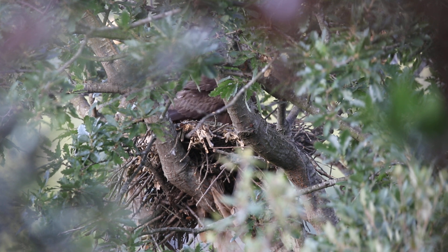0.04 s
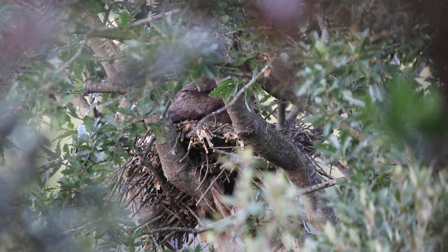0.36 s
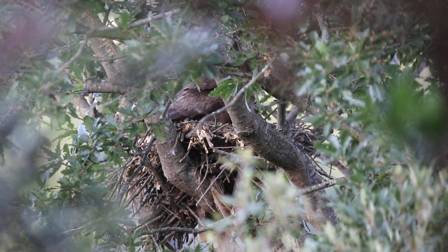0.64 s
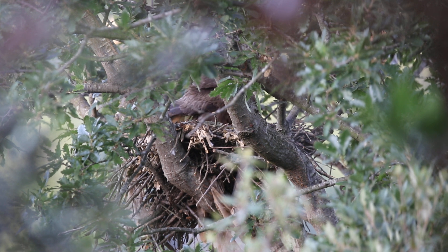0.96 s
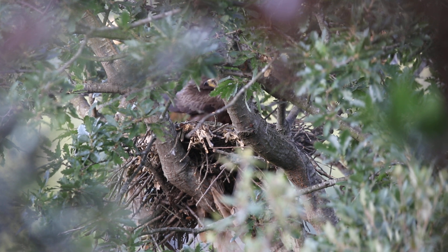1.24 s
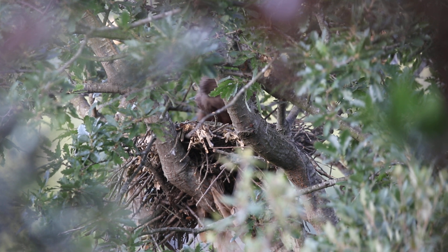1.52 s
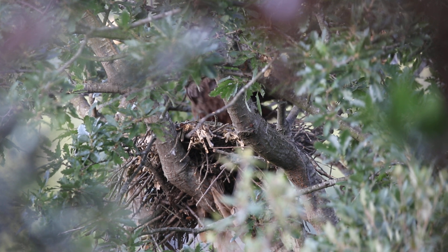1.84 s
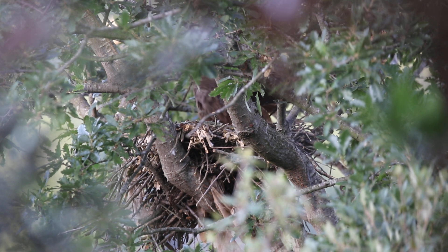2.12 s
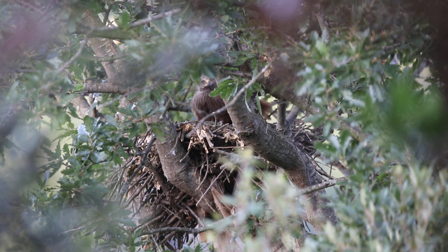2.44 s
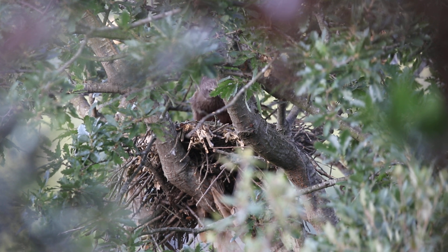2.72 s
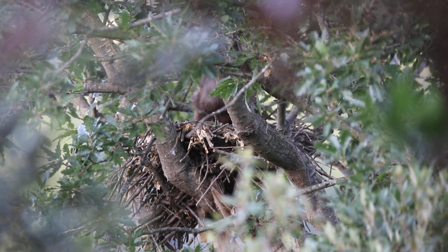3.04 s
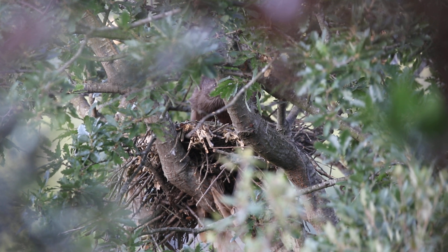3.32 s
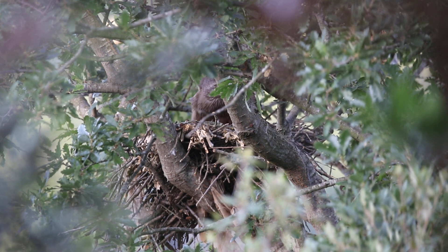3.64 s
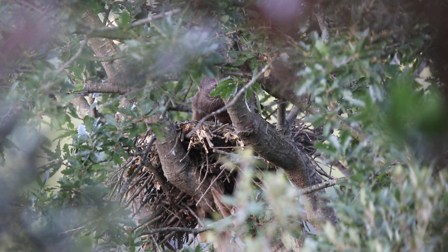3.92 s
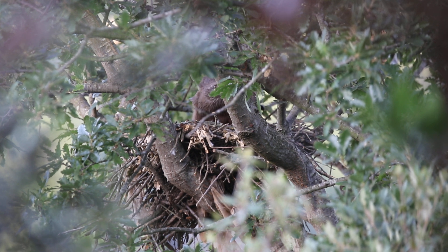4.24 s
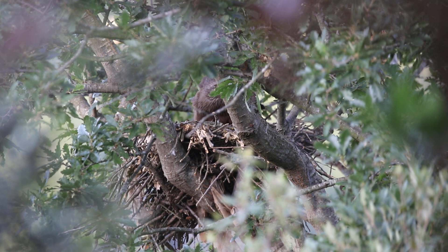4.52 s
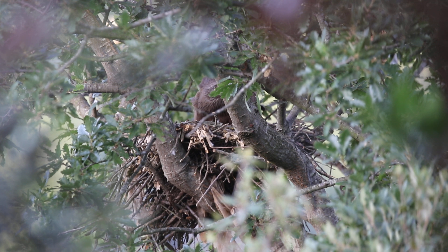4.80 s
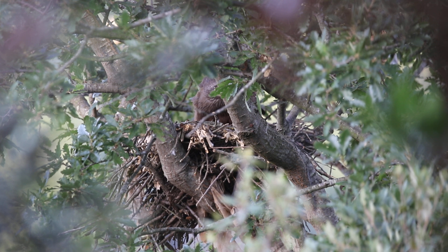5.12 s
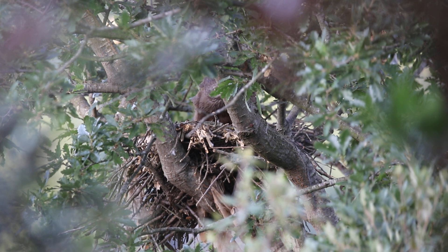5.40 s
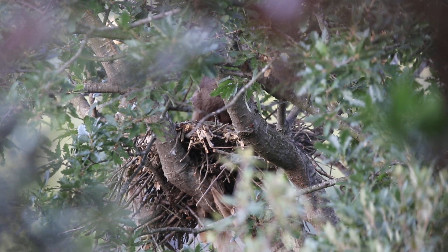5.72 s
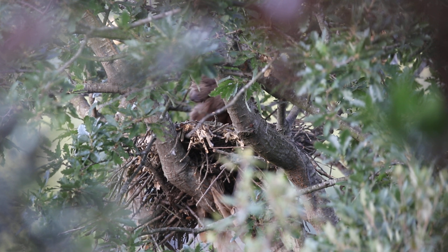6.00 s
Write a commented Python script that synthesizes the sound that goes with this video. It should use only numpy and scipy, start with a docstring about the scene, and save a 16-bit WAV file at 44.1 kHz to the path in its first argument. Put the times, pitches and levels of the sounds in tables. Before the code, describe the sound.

In woodland, small birds warble, chirp and whistle far off over a faint wind in the trees. About halfway through, as they fade, a bird of prey nearer the microphone gives ten short yelps from its tree nest. Each starts as a rasp, clears into a high arched tone and sinks away hoarsely. A few later ones break upward into a whistle, and the trees add a short echoing tail.

```python
"""In woodland, under a faint wind in the trees, small birds warble, chirp and whistle far off.
After about three seconds a bird of prey, nearer the microphone at its tree nest, gives ten yelps.
Each starts as a rasp, clears into an arched tone and sinks away hoarsely; the sixth and the last two
break upward into a whistle. Trunks and foliage scatter the calls into a tail."""
import sys
import numpy as np
from scipy import signal
from scipy.fft import rfft, irfft
from scipy.io import wavfile

SR = 44100
rng = np.random.default_rng(int(sys.argv[2]) if len(sys.argv) > 2 else 0)


def wav_record(signal):
    """Record a signal, one row per channel, as 16-bit PCM in the file named by sys.argv[1]."""
    frames = np.transpose(np.atleast_2d(signal))
    bounded = np.clip(frames, -1, 1)
    # unit amplitude maps onto the largest positive 16-bit level
    quanta = np.round(bounded * 32767).astype(np.int16)
    wavfile.write(sys.argv[1], SR, quanta)


N = 267246
T = np.arange(N) / SR
RASP_S, CLEAR_S = .017, 0.0036  # length of the opening rasp; time for the pitch to lock

# Calls from the nest, the nearest source. arch_share and edge_db lower both ends of the clear tone.
# start_s, tone_s, fade_s, top_hz, arch_share, top_db, edge_db,
# rasp_hz, rasp_db, hoarse_db, overtone_db, buzz_hz
NEST_YELPS = [ (3.333, 0.058, 0.046, 2479, 0.0361, -31, -3, 2193, -44.5, -30, 0, 774),
              (3.731, .028, 0.031, 2053, 0.019, -49, -3.5, 1868, -51, 8, 0, 746),
              (3.873, 0.032, 0.015, 2378, .015, -36.5, -7.5, 1874, -47, -6.5, -1, 879),
              (4.043, 0.048, 0.0038, 2432, 0.016, -35, -14, 1885, -47, -8.5, 1, 852),
              (4.240, 0.04, 0.024, 2563, 0.023, -29, -9, 1932, -46, -22, -2, 931),
              (4.703, 0.076, 0.083, 2917, 0.1, -19, -14, 1803, -51.5, -42, -2, 960),
              (5.026, .040, 0.034, 2648, 0.027, -33.5, -2.5, 1918, -49, -28, 2.5, 1006),
              (5.190, .040, 0.027, 2659, 0.042, -30, -5, 1892, -48.5, -19.5, 0, 939),
              (5.383, 0.045, .035, 2881, .1, -23.5, -10.5, 1925, -49.5, -37, -4.5, 1069),
              (5.885, 0.1, 0.033, 3229, .11, -28, -8.5, 2085, -51, -16, -3, 925), ]


def raptor(overtones_spared=0.71):
    """The bird of prey yelps; where its voice breaks, the overtones escape most of the thinning."""
    out, air = np.zeros(N), noise(BILL_RESONANCE)
    for start, tone_s, fade_s, *shape, overtone_db, buzz_hz in NEST_YELPS:
        span = (T >= start) & (T <= start + RASP_S + tone_s + fade_s)
        t = T[span]
        hz, db, hoarse_db = yelp_contour(t - start, tone_s, *shape)
        ratio, thin_db = voice_break(t)
        bright_db = overtone_db - overtones_spared * thin_db
        out[span] += syrinx(t, hz * ratio, db + thin_db, hoarse_db, bright_db, buzz_hz, air[span])
    return out


def yelp_contour(t, tone_s, top_hz, arch, top_db, edge_db, rasp_hz, rasp_db, hoarse_db):
    """Pitch, level and hoarseness over one yelp: rising rasp, arched tone, falling hoarse fade."""
    rise_hz_per_s, sag_hz_per_s, fall_hz_per_s = 19470, 1470, 9500
    swell_db_per_s, fade_db_per_s, fray_db = 250, 200, 10
    rasp_hoarse_db, fade_hoarse_db = 2.5, 2
    held = np.clip(t - RASP_S, 0, tone_s)
    after = np.maximum(t - RASP_S - tone_s, 0)
    slack = (2 * held / tone_s - 1) ** 2  # 0 in the middle of the tone, 1 at its ends
    frayed = np.minimum(after / 0.019, 1)
    hz = top_hz * (1 - arch * slack) - sag_hz_per_s * (held - tone_s / 2) - fall_hz_per_s * after
    db = top_db + edge_db * slack ** 1.25 - fray_db * frayed - fade_db_per_s * after
    rasping = np.clip((RASP_S - t) / CLEAR_S + .5, 0, 1)
    hz += rasping * (rasp_hz + rise_hz_per_s * t - hz)
    db += rasping * (rasp_db + swell_db_per_s * t - db)
    lingering = (1 - rasping) * 0.89 * np.exp(-held / 0.011)  # hoarseness outlasts the rasp
    rough_start = (rasp_hoarse_db - hoarse_db) * (rasping + lingering)
    rough_end = (fade_hoarse_db - hoarse_db) * frayed
    return hz, db, hoarse_db + rough_start + rough_end


# Breaks into the upper register: start_s, end_s, pitch_ratio, thinning_db
VOICE_BREAKS = [(4.739, 4.789, 1.145, -26), (5.423, 5.435, 1.125, -3.5), (5.923, 5.985, 1.178, -22.5)]
# Thinning across one break: time_share, thinning_share
THINNING = [(0, 0.24), (.45, 0.93), (.72, .1), (1, 0.13)]


def voice_break(t):
    """Pitch ratio and level change while the voice is broken upward: it thins out, then recovers."""
    ratio, db = np.ones(len(t)), np.zeros(len(t))
    for start, end, jump, thin_db in VOICE_BREAKS:
        upper = np.clip(np.minimum(t - start, end - t) / CLEAR_S + .5, 0, 1)
        ratio += (jump - 1) * upper
        db += thin_db * upper * curves(THINNING, (t - start) / (end - start))[0]
    return ratio, db


# The throat's colour on the overtones: frequency_hz, gain_db
THROAT_RESONANCE = [(4200, -6), (5000, -9.5), (5800, -10), (6600, -15), (7200, -15), (8000, -14),
                    (9300, -34), (11400, -34.5), (14000, -43)]
# The open bill's colour on the buzz and the rushing air: frequency_hz, gain_db
BILL_RESONANCE = [(1000, -8.5), (1600, -19), (2100, -11.5), (3100, 3), (3800, -10), (4700, -13),
                  (5800, -12.5), (14000, -28)]


def syrinx(t, hz, db, hoarse_db, overtone_db, buzz_hz, air, shimmer_db=1.5, breath_db=-24):
    """A whistle with overtones; a slower buzz adds sidebands, shakes the pitch and lets air rasp."""
    hoarse = undb(hoarse_db)
    rough = np.minimum(hoarse, 1)
    shake = rough ** 2 * (walk(t, 305) + walk(t, 836) / 2)
    whistle = phase(hz * (1 + 0.0048 * walk(t, 960) + 0.013 * shake))
    buzz = phase(buzz_hz * (1 + .03 * walk(t, 400) + .07 * shake))
    sidebands = sum(colour(BILL_RESONANCE, hz + m * buzz_hz) / abs(m) * np.sin(whistle + m * buzz)
                    for m in (-1.8, -1, 1, 2))
    overtones = sum(colour(THROAT_RESONANCE, k * hz) * np.sin(k * whistle) for k in range(2, 5))
    # the buzz's sideband on the second harmonic
    sum_tone = undb(7) * rough * colour(THROAT_RESONANCE, 2 * hz + buzz_hz) * np.sin(2 * whistle + buzz)
    treble = (1 - rough) * (undb(overtone_db) * overtones + sum_tone)  # grows as the tone clears
    voice = np.sqrt(2) * (np.sin(whistle) + treble + hoarse * sidebands)
    puffs = (undb(breath_db) + .45 * rough ** 3) * air * (1 + np.cos(buzz))  # one per beat of the buzz
    gate = np.clip(np.minimum(t - t[0], t[-1] - t) / 0.0011, 0, 1)
    return (voice + puffs) * gate * undb(db + shimmer_db * walk(t, 249))


# One turn of a distant songbird's warble: time_s, pitch_hz, gain_db
WARBLE_TURN = [(0, 2836, -2.5), (.008, 2630, 1), (.018, 2400, -3), (.04, 2490, -11), (.06, 2380, -11),
               (.09, 2042, -2.5), (.122, 2480, 2), (.138, 2600, -21)]
# Its swell and fade: time_s, level_db
WARBLE_SWELL = [(0, -57), (.3, -49.5), (.41, -54), (.46, -90)]


def warbler(offset_s=.063, turn_s=.152, waver=.014):
    """A connected twitter: the same unsteady turn of pitch, over and over until it dies away."""
    t = T[T < WARBLE_SWELL[-1][0]]
    hz, db = curves(WARBLE_TURN, (t - offset_s) % turn_s)
    tone = np.sqrt(2) * np.sin(phase(hz * (1 + waver * walk(t, 379))))
    return np.pad(tone * undb(db + curves(WARBLE_SWELL, t)[0]), (0, N - len(t)))


# Quick chirps far off in the trees: start_s, length_s, pitch_hz, fall_hz, level_db
FAR_CHIRPS = [ (.6, 0.021, 2090, 150, -52.5), (0.68, 0.024, 2236, 300, -56), (.8, .025, 2160, 100, -57),
              (1.208, 0.017, 3060, 500, -61), (1.264, 0.059, 2550, 910, -61.5),
              (1.424, 0.029, 2700, 1110, -63), (1.563, 0.037, 2470, 600, -59),
              (1.647, 0.014, 3040, 400, -60), ]
# Soft arched whistles, as far away: start_s, length_s, pitch_hz, rise_hz, level_db
FAR_WHISTLES = [ (0.532, 0.11, 3210, 90, -64), (0.724, 0.2, 3960, 147, -72), (1.974, 0.053, 1570, 100, -57),
                (2.025, .14, 2316, 130, -60), (2.257, 0.1, 2271, -31, -51), (2.266, 0.12, 3860, -100, -70),
                (2.489, 0.093, 2120, -52, -53), (2.563, 0.27, 5640, 352, -76),
                (2.748, 0.215, 3670, 16, -66.5), (2.784, 0.4, 4340, 387.5, -75),
                (5.674, .045, 2360, 604, -52.5), (5.79, 0.06, 3200, -180, -58.5), ]
# Scratchy chirps of a hoarser bird: start_s, length_s, pitch_hz, fall_hz, level_db
HOARSE_CHIRPS = [(1.78, 0.065, 3350, 500, -66), (1.968, 0.062, 3280, 500, -58)]


def songbirds(trill_start_s=1, trill_step_s=0.031, arch=0.0369):
    """Small birds: chirps and a five-pip trill fall straight, whistles bend over an arch."""
    trill = [(trill_start_s + k * trill_step_s, 0.012, 2180, 350, -54) for k in range(5)]
    whistles = [(start, length, (1 - arch) * hz - rise / 2, hz, (1 - arch) * hz + rise / 2, db)
                for start, length, hz, rise, db in FAR_WHISTLES]
    clear = sing(falling(FAR_CHIRPS + trill) + whistles, waver=.02)
    return clear + sing(falling(HOARSE_CHIRPS), waver=.08)


def falling(chirps):
    """Notes that glide straight down."""
    return [(start, length, hz + fall / 2, hz, hz - fall / 2, db)
            for start, length, hz, fall, db in chirps]


def sing(notes, waver):
    """Thin, unsteady whistles, each bending through three pitches."""
    out = np.zeros(N)
    for start, length, first_hz, middle_hz, last_hz, db in notes:
        span = (T >= start) & (T < start + length)
        progress = (T[span] - start) / length
        hz = np.polyval(np.polyfit([0, .5, 1], [first_hz, middle_hz, last_hz], 2), progress)
        swell = np.sqrt(2 * np.abs(np.sin(np.pi * progress))) * undb(db + 2 * walk(T[span], 203))
        out[span] += swell * np.sin(phase(hz * (1 + waver * walk(T[span], 370))))
    return out


# Fading chatter of the birds furthest from the microphone: time_s, gain_db
FLOCK_FADE = [(.35, -52), (.55, -57.5), (1.2, -61), (2.6, -67)]


def flock(pip_hz=2250, pip_s=0.041, count=420):
    """Many birds: scratchy pips at random moments and pitches, more falling than rising."""
    draws = rng.standard_normal((count, 2))
    starts = (np.arange(count) + rng.random(count)) / count * (T[-1] - pip_s)
    pitches = pip_hz * np.exp(.22 * draws[:, 0])
    falls = .12 * (.5 + draws[:, 1])
    levels_db = -20 * np.abs(np.log(pitches / pip_hz))  # weaker at the ends of the range
    pips = [(start, pip_s, hz * (1 + fall), hz, hz * (1 - fall), db)
            for start, hz, fall, db in zip(starts, pitches, falls, levels_db)]
    return unit(sing(pips, waver=0.0438)) * undb(curves(FLOCK_FADE, T)[0])


# Wind in the far trees: frequency_hz, gain_db
WIND_SPECTRUM = [(15, -52), (25, -33), (59, -0.5), (148, -4), (204, -0.5), (359, -2.5), (469, -3),
                 (648, -7), (1080, -6), (1490, -13), (3260, -23.5), (3630, -24), (5140, -30), (8130, -28),
                 (15500, -33.5)]
# Its slow gusts: time_s, gain_db
GUSTS = [(0, -48.5), (1.7, -50), (3.8, -48), (6, -50)]


def wind(flicker_db=1.16, hiss_hz=3000, trim_db=0.34):
    """Air in the trees: low octaves follow the gusts and each flickers, the top is a steady hiss."""
    air = noise(WIND_SPECTRUM)
    gust_db, = curves(GUSTS, T)
    out = 0
    for edge_hz in hiss_hz / 2. ** np.arange(6)[::-1]:
        band = signal.sosfiltfilt(signal.butter(2, edge_hz, fs=SR, output="sos"), air)
        air = air - band
        out = out + band * undb(gust_db + flicker_db * walk(T, 8.3))
    return undb(trim_db) * (out + air * undb(gust_db.mean()))


def woods(x, crown_db, trunks_db, crown_t60_s=0.28, trunks_t60_s=0.58, build_s=0.0012, treble_hz=7500):
    """Scattering: dense quick echoes from the crown, then a longer, duller tail from the trunks."""
    t = T[:SR]
    grain = rng.standard_normal((2, SR)) * np.exp(.5 * rng.standard_normal((2, SR)))
    grain *= 1 - np.exp(-(t / build_s) ** 2)
    crown = grain[0] * undb(-60 * t / crown_t60_s)
    trunks = grain[1] * undb(-60 * t / trunks_t60_s)
    crown /= np.linalg.norm(crown)
    trunks = slope(trunks / np.linalg.norm(trunks), "lowpass", treble_hz)
    return signal.fftconvolve(x, undb(crown_db) * crown + undb(trunks_db) * trunks)[:N]


def undb(db):
    """Decibels to gain."""
    return 10 ** (np.asarray(db) / 20)


def unit(x):
    """Scale to rms 1."""
    return x / np.sqrt(np.mean(x ** 2))


def curves(rows, t):
    """The columns of a table, joined by straight lines in time."""
    times, *columns = np.transpose(rows)
    return [np.interp(t, np.sort(times), column) for column in columns]


def colour(points, hz):
    """Gain of a (Hz, dB) spectrum at the given frequencies."""
    points_hz, db = np.transpose(points)
    return undb(np.interp(np.log(np.abs(hz) + 1), np.log(points_hz), db))


def noise(points):
    """Noise with the given spectrum, rms 1."""
    return unit(irfft(rfft(rng.standard_normal(N)) * colour(points, np.fft.rfftfreq(N, 1 / SR)), N))


def walk(t, rate):
    """Random wavering with about `rate` turns a second, spread near 1."""
    return 1.2 * np.interp((t - t[0]) * rate, np.arange(4096), rng.standard_normal(4096))


def phase(hz):
    """Phase of an oscillator at a moving frequency."""
    return 2 * np.pi * np.cumsum(hz) / SR


def slope(x, kind, hz, order=1):
    """Gentle low-pass or high-pass."""
    return signal.lfilter(*signal.butter(order, hz, kind, fs=SR), x)


def scene(beam_hz=4100):
    """One microphone in the wood: the nest is nearest, small birds and wind lie behind."""
    yelps, chatter = raptor(), flock()
    song = warbler() + songbirds()
    # the bill beams the treble away from the microphone, and leaves throw back short waves best
    direct = slope(yelps, "lowpass", beam_hz, order=2)
    near = direct + woods(slope(yelps, "highpass", hz=2900), crown_db=-4, trunks_db=-2.5)
    # less of the flock arrives directly
    far = song + chatter / 2 + woods(song + chatter, crown_db=-6.5, trunks_db=-18)
    return (near + far + wind())[None]


def record(dry):
    """The microphone chain cuts the top steeply."""
    top_hz = 15750
    return signal.sosfilt(signal.ellip(10, .1, 70, top_hz, fs=SR, output="sos"), dry)


dry = scene()
out = record(dry)
wav_record(out)
```